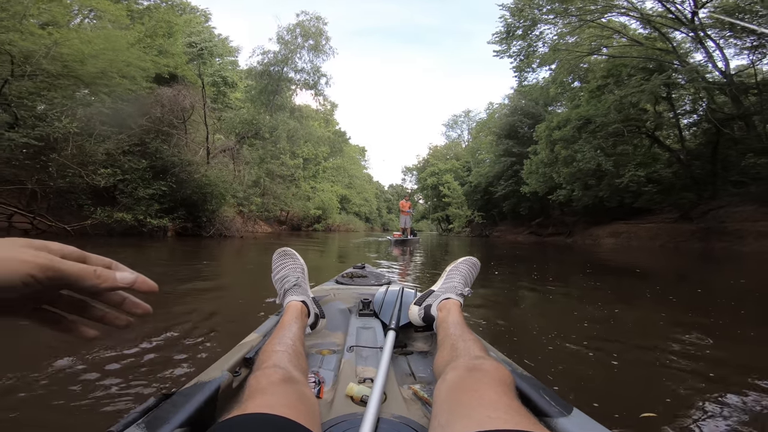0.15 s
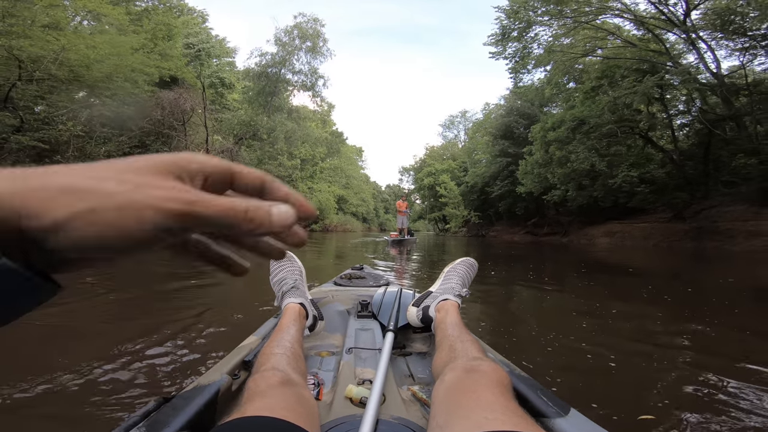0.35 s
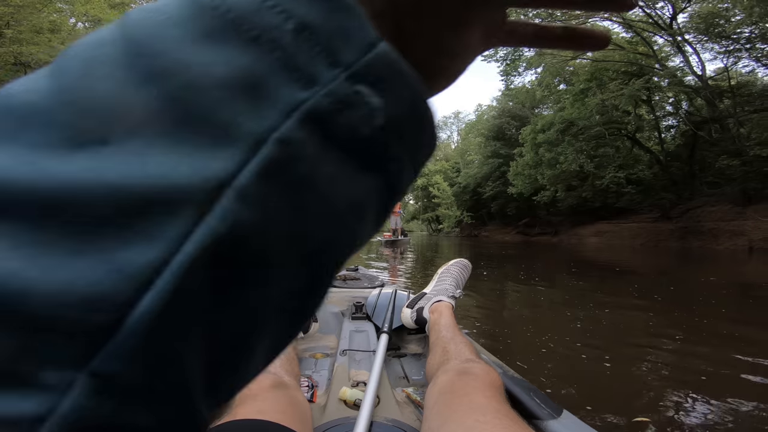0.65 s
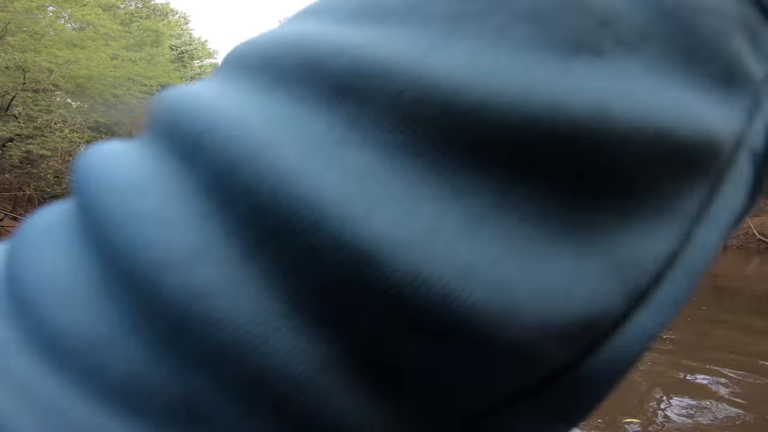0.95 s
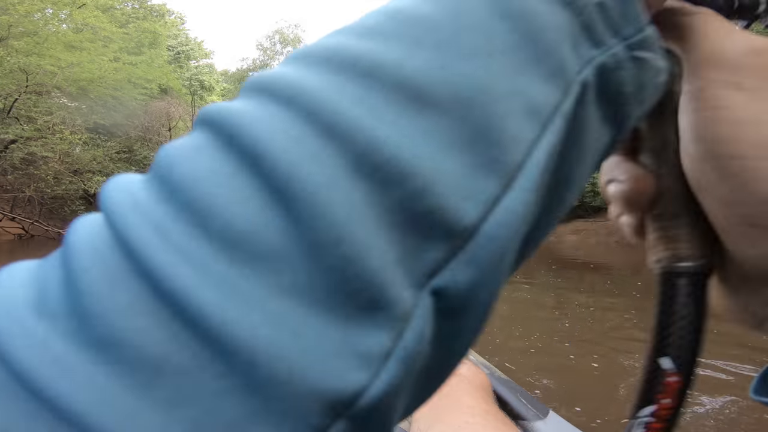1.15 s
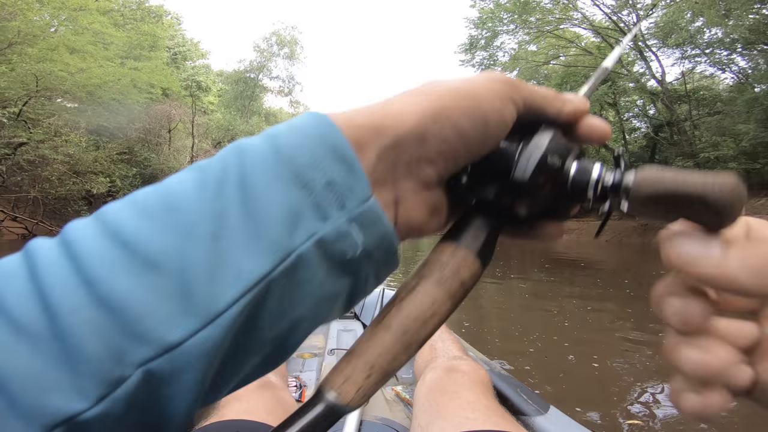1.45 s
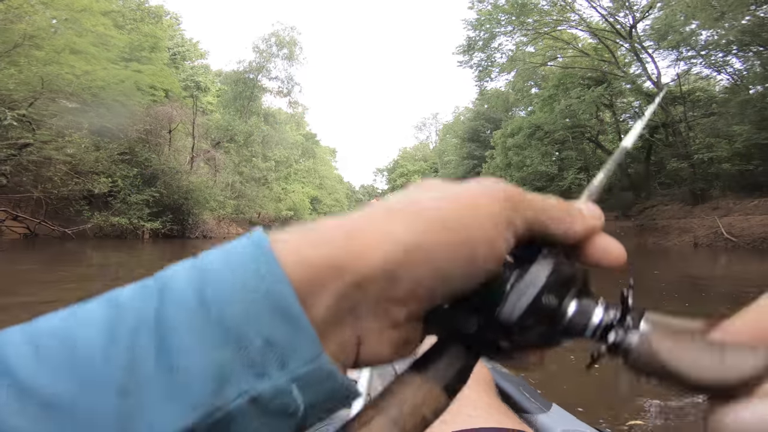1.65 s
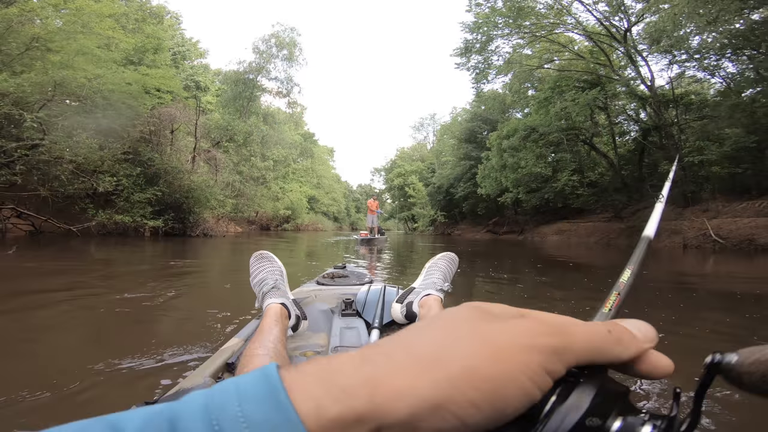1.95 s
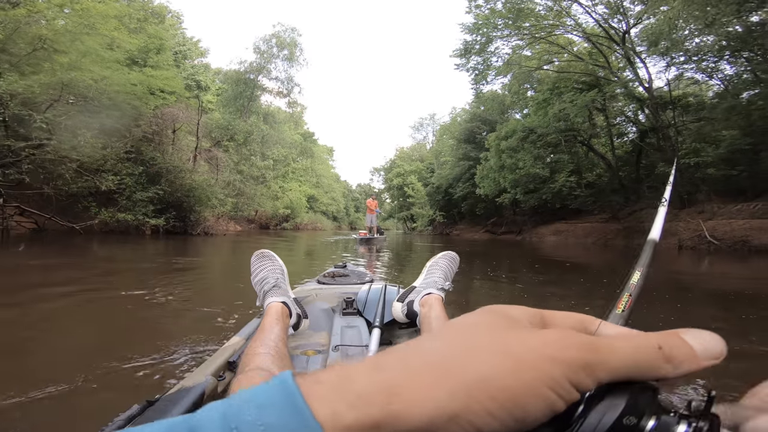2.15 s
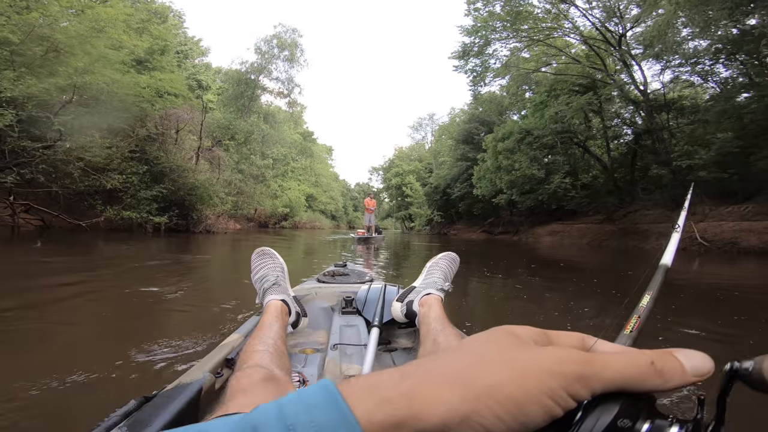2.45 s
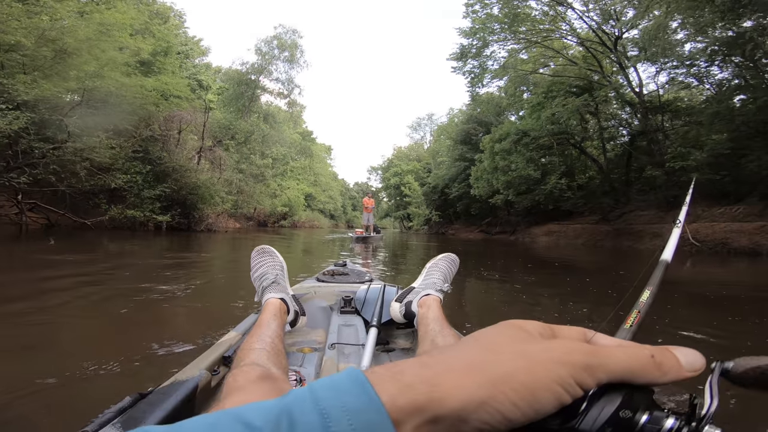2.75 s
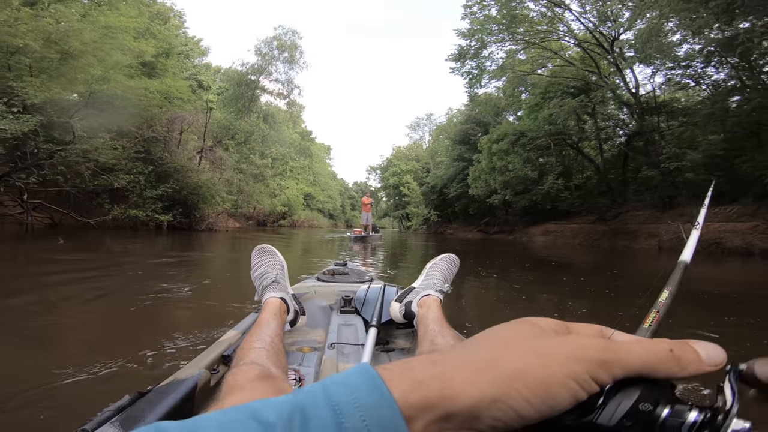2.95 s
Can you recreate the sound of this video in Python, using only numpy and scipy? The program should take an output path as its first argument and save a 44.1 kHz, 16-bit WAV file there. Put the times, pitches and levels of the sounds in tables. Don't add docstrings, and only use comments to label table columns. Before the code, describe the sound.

Single loud, crisp reel click close up in a kayak, with faint birdsong in quiet woods

```python
import sys
import numpy as np
from scipy import signal
from scipy.fft import rfft, irfft
from scipy.io import wavfile
from scipy.ndimage import uniform_filter1d, map_coordinates

SR = 44100
rng = np.random.default_rng(int(sys.argv[2]) if len(sys.argv) > 2 else 0)


def attenuation_scalar(level_db):
    decades = np.asarray(level_db, float) / 20
    return 10 ** decades


def materialize(psi):
    bounded = np.clip(np.atleast_2d(psi).T, -1, 1)
    quanta = np.round(bounded * 32767).astype(np.int16)
    wavfile.write(sys.argv[1], SR, quanta)


N = 136710

# f/Hz, level/dB
RUMBLE_SPECTRUM = [(19, -32), (33, 1), (124, -5), (276, -14.5), (314, -17.5), (483, -15.5), (604, -17),
                   (1020, -16), (1500, -24), (1950, -58), (3300, -120)]
# f/Hz, level/dB
LEAF_SPECTRUM = [(880, -72), (1500, -8), (1780, -3.5), (2290, -8), (4080, -5), (6500, -18), (8450, -54),
                 (14300, -120)]
# t/s, level/dB
BREEZE = [(0, 3.5), (.5, 2), (1.1, 0.4), (1.5, 2), (1.8, 0.5), (2.4, 0.3), (3.1, 1.3)]
# f/Hz, level/dB
HISS_SPECTRUM = [(3820, -23), (6500, -3.5), (7150, 0.5), (9300, -1), (13400, -4), (15600, -4.5),
                 (15800, -60)]
RUMBLE_DB, LEAVES_DB, HISS_DB, HISS_FADE_DB = -56.5, -65, -80, 2.5
# f/Hz, width/Hz, level/dB
HUMS = [(132.5, 13, -71.5), (209, 8, -78.5), (227, 7.4, -74), (285.6, 4.4, -70.5), (360.6, 7.1, -79.5),
        (437.6, 8, -79.5), (494.3, 5, -81.5), (1049, 28, -70)]
# t/s, level/dB
SWAY = [(0.0, -43), (0.03, -47.5), (0.51, -46.5), (0.57, -58), (0.76, -38.5), (1.16, -43.5), (1.42, -33),
        (1.91, -45), (1.99, -36.5), (2.25, -50), (2.66, -38.5), (2.74, -47.5), (2.9, -38.5), (3.1, -48)]
SWAY_HZ, SWAY_WANDER = 6.5, 0.1447

# t/s, length/s, top f/Hz, level/dB, share of the rise time
WHISTLES = [
    (-.035, 0.048, 7370, -65, 1.0),
    (0.049, 0.037, 6660, -63.5, 0.43),
    (2.888, 0.054, 7470, -64.5, 1),
    (2.981, 0.051, 7080, -62.5, 0.99),
]
WHISTLE_RISE_HZ, WHISTLE_RISE_S = 990, 0.0062
WHISTLE_DROP_HZ, WHISTLE_DROP_S, WHISTLE_FLUTTER_DB = 710, 0.003, 3.5
# t/s, level/dB
CHIPS = [
    (.008, -62.5),
    (.221, -61.5),
    (0.451, -65.5),
    (3.086, -68.5),
]
CHIP_S, CHIP_TOP_HZ, CHIP_RISE_HZ, CHIP_RISE_S = 0.05, 3880, 1000, 0.0045
CHIP_FLUTTER_DB = 4
LEAD_S, LEAD_HZ, LEAD_DB = 0.02, 2436, -8
# t/s, level/dB, share of the top pitch
TRILL = [
    (.113, -65, .99),
    (.197, -65, 0.99),
    (.285, -65, 0.97),
    (.37, -66.5, 0.97),
    (.455, -68, 0.96),
    (.541, -66, 0.95),
    (.63, -66.5, 0.95),
    (3.057, -70.5, 0.99),
]
TRILL_S, TRILL_TOP_HZ, TRILL_RISE_HZ, TRILL_RISE_S = 0.046, 6250, 2500, 0.019
TRILL_FLUTTER_DB, TRILL_WOBBLE_HZ = 5, 120
FLIP_HZ, FLIP_DB = 7200, -14
UNDER_S, UNDER_HZ, UNDER_RISE_HZ, UNDER_DB = 0.024, 4150, 500, -7
SLAP_S, SLAP_DB = 0.016, -7
WOOD_T60_S, WOOD_DB, WOOD_GAP_S = 0.6, -1.5, 0.005
NEAR_T60_S, NEAR_DB = 0.1, -5

# t/s, length/s, start f/Hz, fall/Hz, level/dB
SQUEAKS = [
    (.188, .02, 10700, 50, -78),
    (.195, .11, 11500, 900, -87),
    (.735, .02, 11700, -400, -83),
    (.808, .022, 11600, 1000, -80),
]
# t/s, length/s, f/Hz, level/dB, top line level/dB
BURRS = [
    (0.724, 0.082, 4000, -65.5, -13),
    (0.866, 0.09, 3880, -71.5, -3),
]
# f ratio, level/dB
BURR_LINES = [(.9, -3), (1.0, 0), (1.09, -12)]
BURR_ARCH_HZ, BURR_TOP_RATIO, BURR_FLUTTER_DB, BURR_WET_DB = 243, 1.2, 2.5, -6

# t/s, length/s, level/dB
RUSTLES = [
    (.77, 0.12, -83),
    (1.252, 0.16, -78),
    (1.376, 0.23, -76.5),
    (1.66, 0.18, -77),
    (2.04, 0.14, -79),
    (2.974, 0.12, -79.5),
]
RUSTLE_HZ, RUSTLE_WIDTH_HZ = 10100, 3700
# t/s, level/dB, length/s, centre f/Hz
TICKS = [(.787, -61, 0.0029, 7500), (0.829, -60, 0.008, 2600), (.866, -68, .005, 2300),
         (1.047, -74, 0.004, 9000), (1.062, -63, 0.011, 4450), (1.064, -75, .01, 9500),
         (1.147, -62, 0.0032, 8000), (1.212, -68.5, 0.0054, 9000), (1.556, -70, 0.0047, 9000),
         (2.429, -59, 0.006, 3400), (2.431, -70.5, .006, 7200)]
# t/s, level/dB, brightness/(dB per octave)
KNOCKS = [
    (1.068, -46, -1),
    (1.133, -45, 3.5),
    (1.138, -46, 2),
    (1.143, -48, 1),
    (1.152, -54, 0),
    (1.218, -54, 0),
]
# f/Hz, level/dB, decay T60/s
HULL_MODES = [(105, -6, .05), (230, -3, .04), (400, -2, .03), (620, -8, .02), (900, -5, .015)]
SLUMP_S, SLUMP_LENGTH_S, SLUMP_HZ, SLUMP_FALL_HZ, SLUMP_DB = 1.136, 0.044, 265, 114, -58

# t/s, peak level/dB, brightness/(dB per octave)
CLUTCH = [(1.9438, -33, 0), (1.9457, -19, 3), (1.9464, -35, 13), (1.9482, -18.5, -6), (1.9495, -21, 3),
          (1.9502, -6.5, 1), (1.9510, -9.5, -0.5), (1.9517, -25, -2.5), (1.9532, -29, -1),
          (1.9546, -29, -7), (1.9572, -39, -3), (1.9596, -22, -4), (1.9603, -15.5, 2), (1.9610, -27, -2),
          (1.9618, -34.5, -13.5), (1.9655, -38, -4), (1.9672, -34, -8), (1.9692, -40, -13),
          (1.9716, -48, -8), (1.9730, -47, -12)]
# f/Hz, level/dB, decay T60/s
REEL_MODES = [(835, -19, 0.017), (1770, -22.5, 0.0043), (2320, -14.5, 0.0084), (3460, -9, 0.0096),
              (3980, -4.5, 0.0077), (4900, 2.5, 0.0063), (6300, -1, 0.0044), (7700, -9, 0.006),
              (8700, -11.5, 0.0054), (10130, -9.5, 0.0049), (11270, -17, 0.0037), (12100, -16, 0.005),
              (13700, -20, 0.005), (15600, -21, 0.0055)]
# f/Hz, level/dB
RATTLE_SPECTRUM = [(400, -11), (900, 2), (4000, 12), (6000, -15), (9000, -12), (15000, -18), (16000, -40)]
RATTLE_DB, RATTLE_T60_S = -35.5, 0.065
GRIP_HZ, GRIP_DB, GRIP_T60_S = 374, -46.5, 0.1
PLATE_S, PLATE_HZ, PLATE_DB, PLATE_T60_S, PLATE_STOP_S = 1.9496, 1670, -23, 0.04, 1.9572
SCATTER_S, SCATTER_LENGTH_S, SCATTER_DB, SCATTER_FADE_DB = 1.942, 0.038, -54, 6
# f/Hz, level/dB
SIDE_SPECTRUM = [(100, -62), (380, -36), (1300, -31.5), (3000, -29), (6000, -22), (9000, -9.5),
                 (13000, -18.5)]


def rms_one(x):
    return x / np.sqrt(np.mean(x ** 2) + 1e-20)


def in_time(rows):
    return np.interp(np.arange(N) / SR, *np.transpose(rows))


def colour(x, points):
    hz, db = np.transpose(points)
    bins_hz = np.fft.rfftfreq(len(x), 1 / SR)
    gain_db = np.interp(np.log(bins_hz + 1), np.log(hz), db)
    return irfft(rfft(x) * attenuation_scalar(gain_db), len(x))


def coloured_noise(points):
    return rms_one(colour(rng.standard_normal(N), points))


def band_noise(low_hz, high_hz):
    band = signal.butter(2, [low_hz, high_hz], "band", fs=SR, output="sos")
    return rms_one(signal.sosfilt(band, rng.standard_normal(N)))


def drift(rate, size=N):
    return map_coordinates(rng.standard_normal(4000), [np.arange(size) / SR * rate + 2], order=3)


def ring(x, hz, t60):
    r, w = attenuation_scalar(-60 / (t60 * SR)), 2 * np.pi * hz / SR
    return signal.lfilter([0, np.sin(w)], [1, -2 * r * np.cos(w), r * r], x + 1e-18)


def swell(start, length, edge):
    t = np.arange(-SR, N) / SR - start
    envelope = np.clip(np.minimum(t, length - t) / edge, 0, 1) ** 2
    return np.clip(t, 0, length), envelope


def sing(hz, envelope, db):
    return attenuation_scalar(db + 5.5) * envelope * np.sin(2 * np.pi * np.cumsum(hz) / SR)


def click(start, db):
    return (np.arange(N) == int(start * SR)) * attenuation_scalar(db)


def strike(events, modes, spread_db):
    start, db, tilt = np.transpose(events)
    luck = rng.standard_normal((len(start), len(modes)))
    out = 0
    for k, (hz, level_db, t60) in enumerate(modes):
        clicks = np.zeros(N)
        strength_db = db + level_db + tilt * np.log2(hz / 4000) + spread_db * luck[:, k]
        clicks[(start * SR).astype(int)] = attenuation_scalar(strength_db) * (-1) ** k
        out = out + ring(clicks, hz, t60)
    return out


def air_sway():
    lumps = coloured_noise([(4, -10), (9, 13.5), (16, 14.5), (25, -17.5), (40, -59)])
    rate_hz = SWAY_HZ * (1 + SWAY_WANDER * drift(5.1))
    sway = np.sqrt(2) * np.sin(2 * np.pi * np.cumsum(rate_hz) / SR)
    return attenuation_scalar(uniform_filter1d(in_time(SWAY), size=3000)) * (0.95 * sway + 0.23 * lumps)


def creek():
    breeze_db = in_time(BREEZE) - np.mean(in_time(BREEZE))
    out = attenuation_scalar(RUMBLE_DB + 0.6 * drift(8)) * coloured_noise(RUMBLE_SPECTRUM)
    out += attenuation_scalar(LEAVES_DB + breeze_db) * coloured_noise(LEAF_SPECTRUM)
    out += attenuation_scalar(HISS_DB + HISS_FADE_DB * np.linspace(1, 0, N)) * coloured_noise(HISS_SPECTRUM)
    for hz, width_hz, db in HUMS:
        out += attenuation_scalar(db) * rms_one(ring(rng.standard_normal(N), hz, 1.86 / width_hz))
    return out + air_sway()


def whistles(flutter):
    out = 0
    for start, length, hz, db, slow in WHISTLES:
        t, env = swell(start, length, 0.0068)
        rise = WHISTLE_RISE_HZ * np.exp(-t / WHISTLE_RISE_S / slow)
        drop = WHISTLE_DROP_HZ * np.exp((t - length) / WHISTLE_DROP_S)
        out = out + sing(hz - rise - drop, env, db + WHISTLE_FLUTTER_DB * flutter)
    return out


def chips(flutter):
    out = 0
    for start, db in CHIPS:
        t, env = swell(start, CHIP_S, 0.0021)
        glide = CHIP_TOP_HZ - CHIP_RISE_HZ * np.exp(-t / CHIP_RISE_S)
        out = out + sing(glide, env * attenuation_scalar(-150 * t), db + CHIP_FLUTTER_DB * flutter)
        t, env = swell(start - LEAD_S, LEAD_S, 0.004)
        out = out + sing(LEAD_HZ - 300 * (1 - t / LEAD_S), env, db + LEAD_DB)
    return out


def trill(flutter):
    out, wobble_hz = 0, TRILL_WOBBLE_HZ * drift(350, size=N + SR)
    for start, db, share in TRILL:
        t, env = swell(start, TRILL_S, 0.0034)
        glide = share * TRILL_TOP_HZ - TRILL_RISE_HZ * np.exp(-t / TRILL_RISE_S) + wobble_hz
        growing = env * (0.6 + 0.6 * t / TRILL_S)
        out = out + sing(glide, growing, db + TRILL_FLUTTER_DB * flutter)
        t, env = swell(start + 0.032, 0.0083, 0.0036)
        out = out + sing(FLIP_HZ + wobble_hz, env, db + FLIP_DB)
        t, env = swell(start + UNDER_S, UNDER_S, 0.005)
        under_hz = UNDER_HZ - UNDER_RISE_HZ * (1 - t / UNDER_S) ** 2 + wobble_hz
        out = out + sing(under_hz, env, db + UNDER_DB)
    return out + attenuation_scalar(SLAP_DB) * np.roll(out, int(SLAP_S * SR))


def birds():
    flutter = np.tanh(drift(220, size=N + SR))
    return whistles(flutter) + chips(flutter) + trill(flutter)


def wood(x):
    t = np.arange(SR) / SR
    far, near = (rng.standard_normal(SR) * attenuation_scalar(-60 * t / t60) * (t > WOOD_GAP_S)
                 for t60 in (WOOD_T60_S, NEAR_T60_S))
    tail = (attenuation_scalar(WOOD_DB) * rms_one(far) + attenuation_scalar(NEAR_DB) * rms_one(near)) / np.sqrt(SR)
    return signal.fftconvolve(x, tail)[SR:SR + N]


def squeaks():
    out = 0
    for start, length, hz, fall_hz, db in SQUEAKS:
        t, env = swell(start, length, 0.0067)
        out = out + sing(hz - fall_hz * t / length, env, db)
    return out[SR:]


def burrs():
    out, flutter = 0, drift(60.0, size=N + SR)
    for start, length, hz, db, top_db in BURRS:
        t, env = swell(start, length, 0.011)
        arch_hz = hz - BURR_ARCH_HZ * (t / length / 0.578 - 1) ** 2
        for ratio, line_db in BURR_LINES + [(BURR_TOP_RATIO, top_db)]:
            own_flutter = np.roll(flutter, int(ratio * SR))
            out = out + sing(ratio * arch_hz, env, db + line_db + BURR_FLUTTER_DB * own_flutter)
    return out


def sleeve():
    cloth = band_noise(RUSTLE_HZ - RUSTLE_WIDTH_HZ / 2, RUSTLE_HZ + RUSTLE_WIDTH_HZ / 2)
    rubs = sum(attenuation_scalar(db) * swell(start, length, 0.035)[1][SR:] for start, length, db in RUSTLES)
    return cloth * attenuation_scalar(1.2 * drift(90)) * rubs


def reel_ticks():
    out = 0
    for start, db, length, hz in TICKS:
        envelope = swell(start, length, 0.0015)[1][SR:]
        out = out + attenuation_scalar(db) * envelope * band_noise(hz * 0.65, hz * 1.4)
    return out


def hull():
    t, env = swell(SLUMP_S, SLUMP_LENGTH_S, 0.011)
    sag_hz = SLUMP_HZ - SLUMP_FALL_HZ * np.sqrt(t / SLUMP_LENGTH_S)
    return strike(KNOCKS, HULL_MODES, spread_db=3.0) + sing(sag_hz, env, SLUMP_DB)[SR:]


def clutch():
    time, snap_s = np.arange(N) / SR, CLUTCH[4][0]
    hits = attenuation_scalar(-10) * strike(CLUTCH, REEL_MODES, spread_db=1.5)
    damping = np.clip((PLATE_STOP_S - time) / 0.0016, 0.08, 1)
    plate = damping * ring(click(PLATE_S, PLATE_DB), PLATE_HZ, PLATE_T60_S)
    thud = ring(click(snap_s, GRIP_DB), GRIP_HZ, GRIP_T60_S)
    t = time - snap_s
    rattle = attenuation_scalar(RATTLE_DB - 60 * np.abs(t) / RATTLE_T60_S) * (t > 0) * coloured_noise(RATTLE_SPECTRUM)
    return hits + plate + thud + rattle


def snap_scatter():
    t, env = swell(SCATTER_S, SCATTER_LENGTH_S, 0.0049)
    hiss = coloured_noise([(150, -30), (700, 1), (2500, -5), (4500, 0), (11000, -2), (15500, -12)])
    return hiss * (env * attenuation_scalar(SCATTER_DB - SCATTER_FADE_DB * t / SCATTER_LENGTH_S))[SR:]


def scene():
    song, burr, snap = birds(), burrs(), clutch()
    echoes = wood(song + attenuation_scalar(BURR_WET_DB) * burr)
    boat = sleeve() + reel_ticks() + hull()
    rest = creek() + song[SR:] + burr[SR:] + echoes + squeaks() + boat
    scatter = rng.standard_normal(400) * np.exp(-np.arange(400) / 60)
    scatter = scatter / np.sqrt(np.sum(scatter ** 2))
    side = colour(np.convolve(rest, scatter)[:N], SIDE_SPECTRUM) + snap_scatter()
    return np.array([rest + snap + side, rest + snap - side])


def low_pass(x):
    return signal.sosfilt(signal.butter(12, 16660, fs=SR, output="sos"), x)


def record(dry):
    top_cut = signal.cheby2(10, 50, 16600, fs=SR, output="sos")
    mix = signal.sosfilt(top_cut, dry)
    return low_pass(mix)


dry = scene()
out = record(dry)
materialize(out)
```